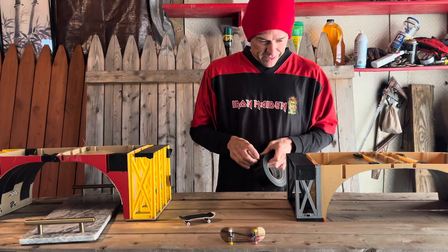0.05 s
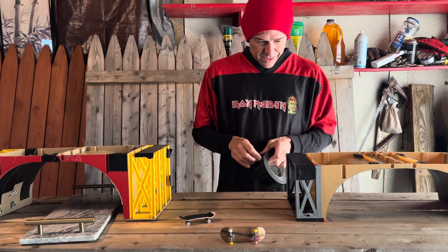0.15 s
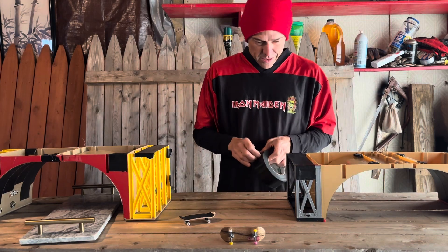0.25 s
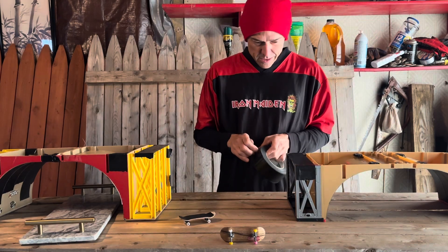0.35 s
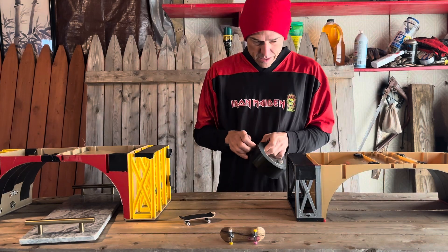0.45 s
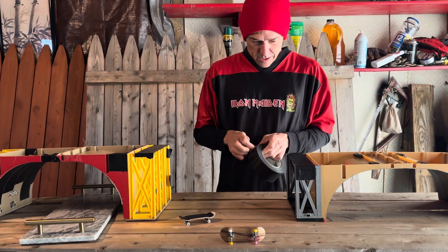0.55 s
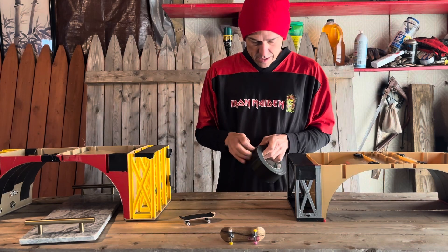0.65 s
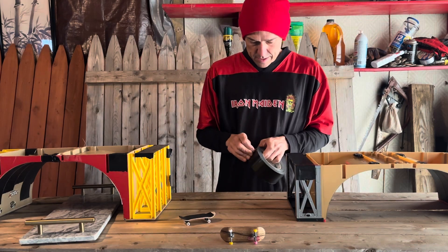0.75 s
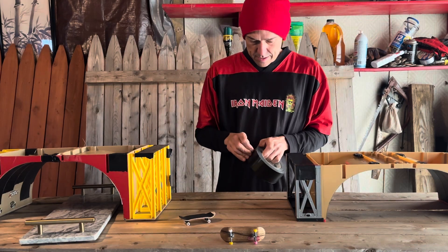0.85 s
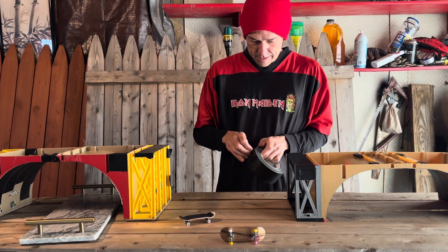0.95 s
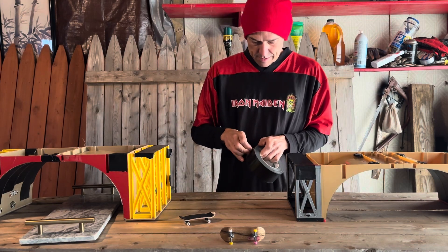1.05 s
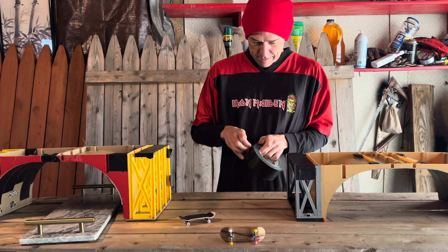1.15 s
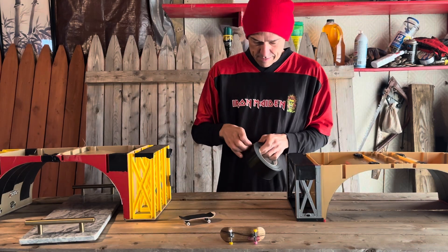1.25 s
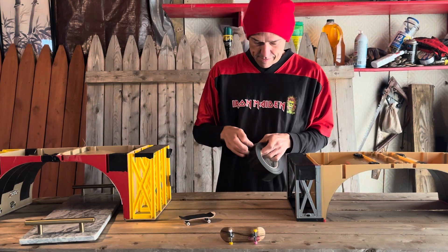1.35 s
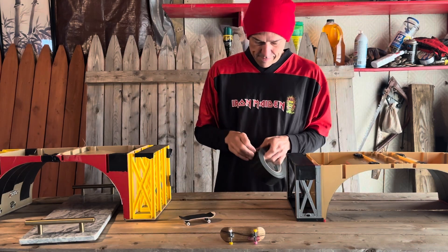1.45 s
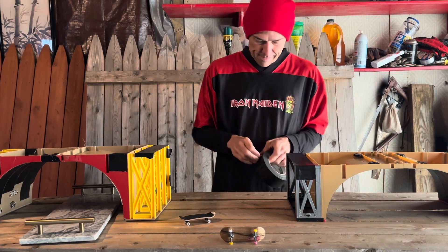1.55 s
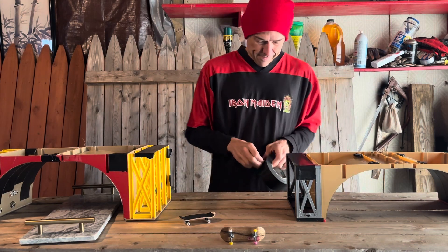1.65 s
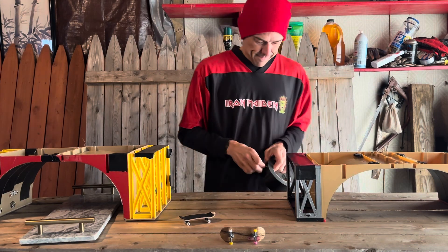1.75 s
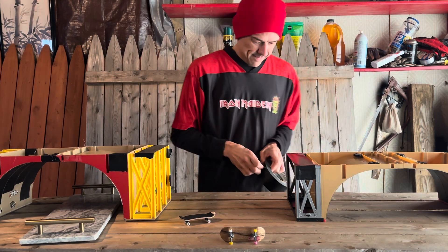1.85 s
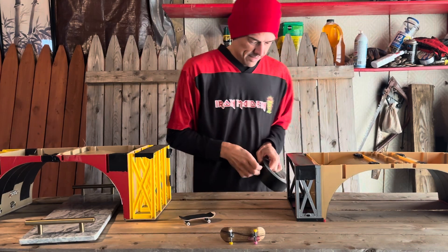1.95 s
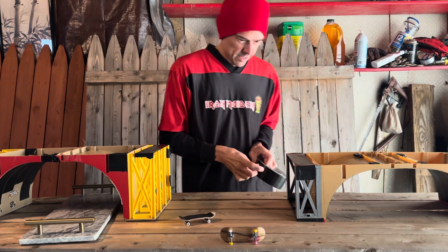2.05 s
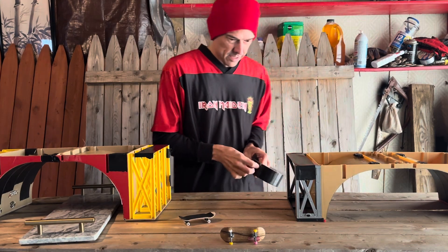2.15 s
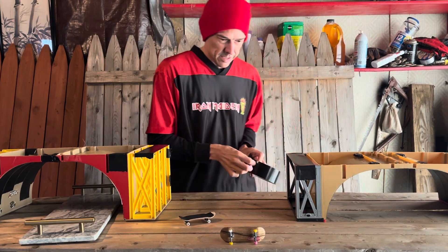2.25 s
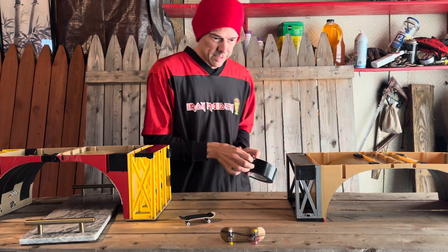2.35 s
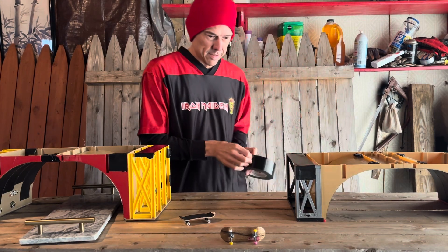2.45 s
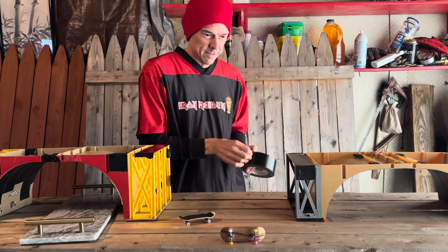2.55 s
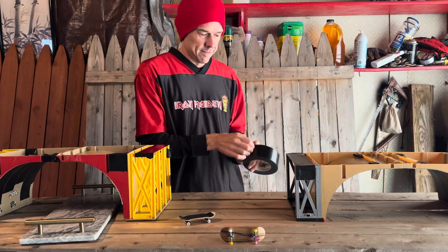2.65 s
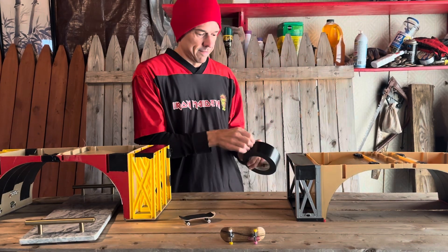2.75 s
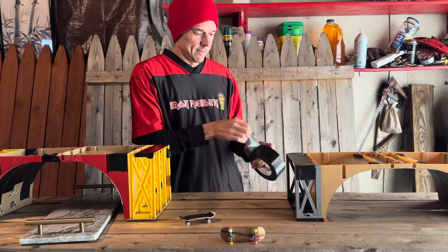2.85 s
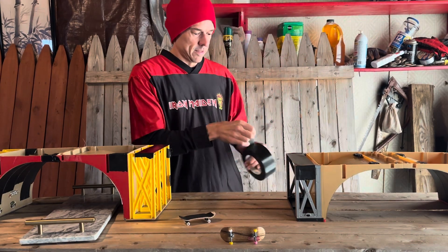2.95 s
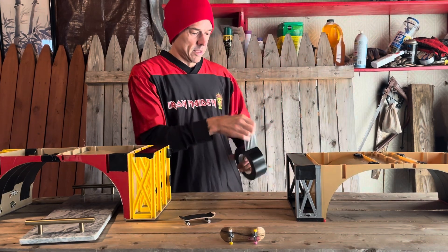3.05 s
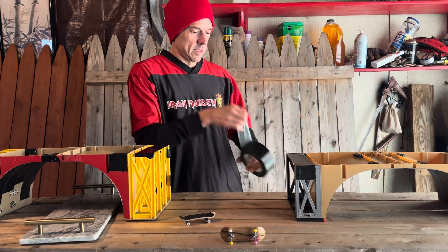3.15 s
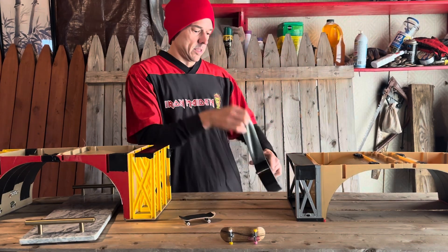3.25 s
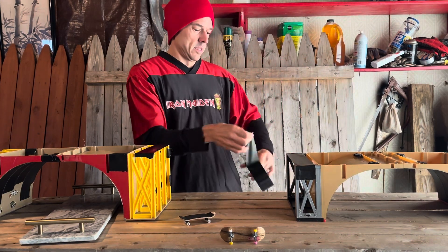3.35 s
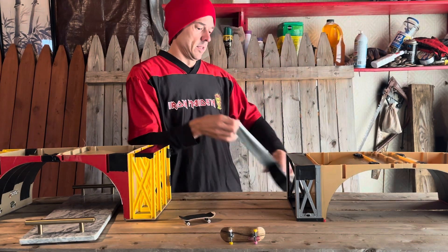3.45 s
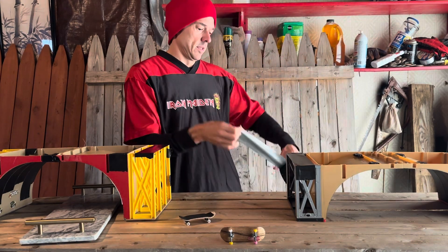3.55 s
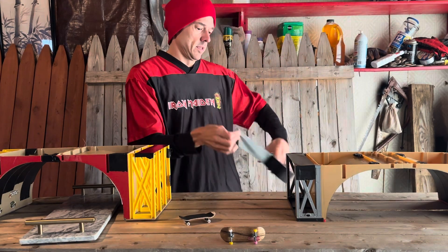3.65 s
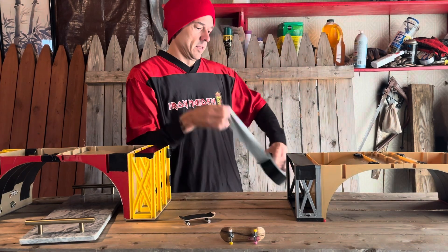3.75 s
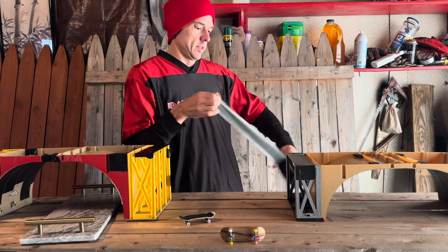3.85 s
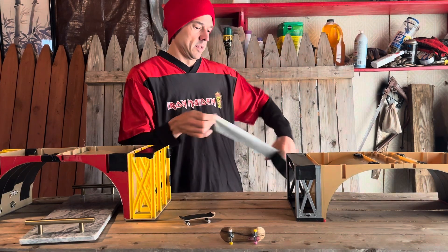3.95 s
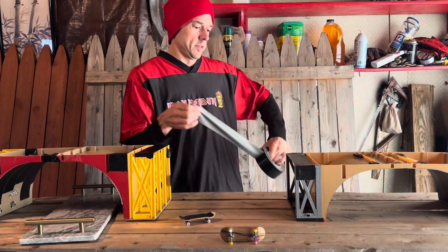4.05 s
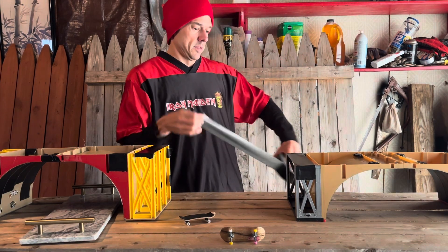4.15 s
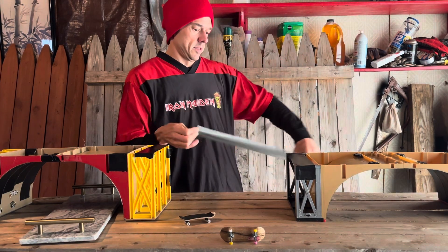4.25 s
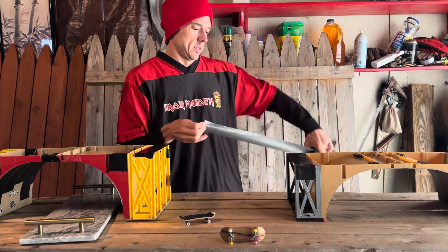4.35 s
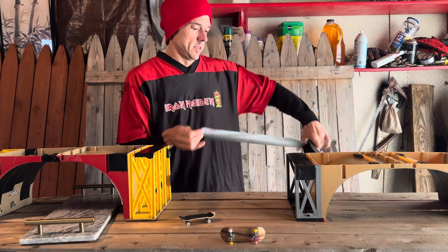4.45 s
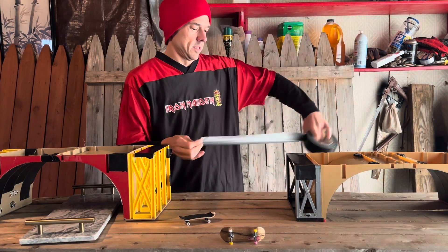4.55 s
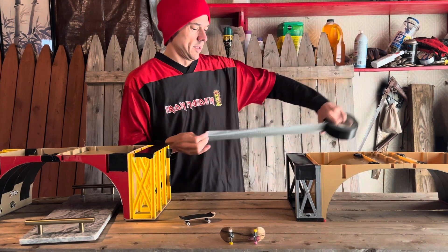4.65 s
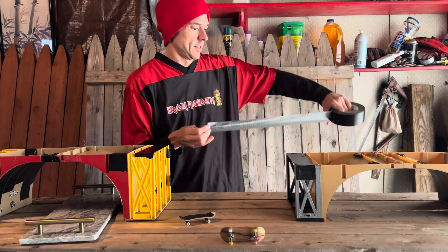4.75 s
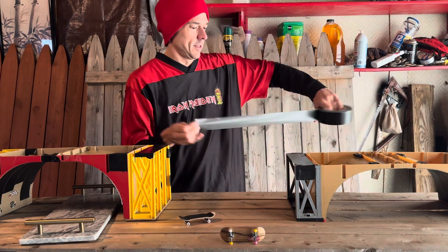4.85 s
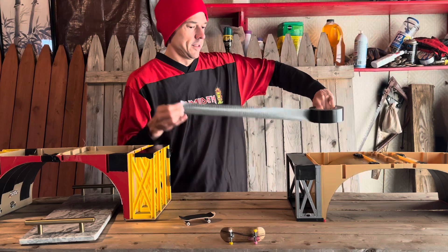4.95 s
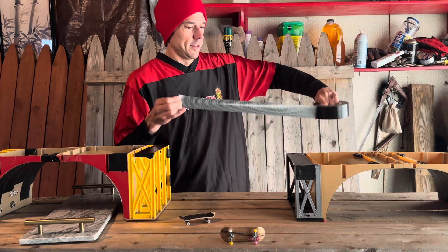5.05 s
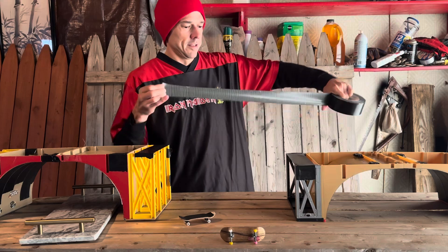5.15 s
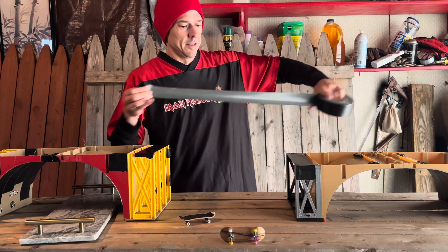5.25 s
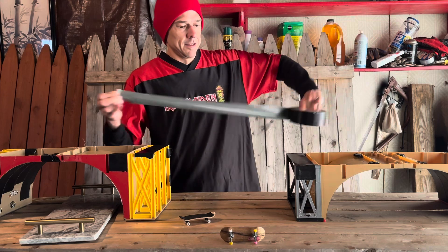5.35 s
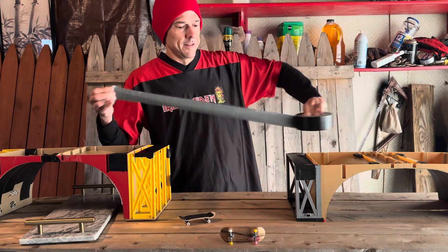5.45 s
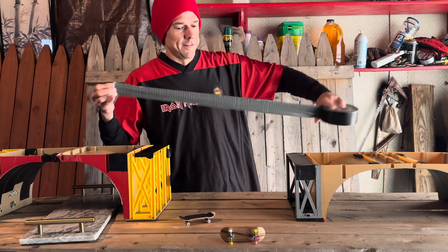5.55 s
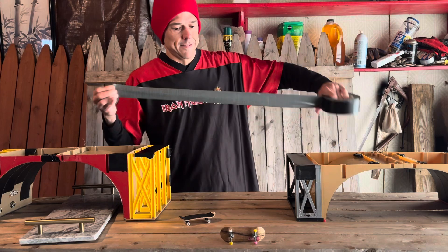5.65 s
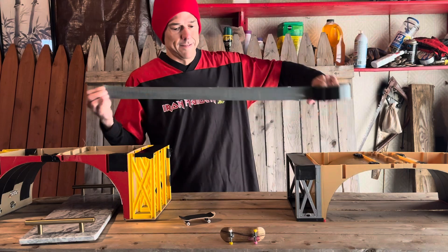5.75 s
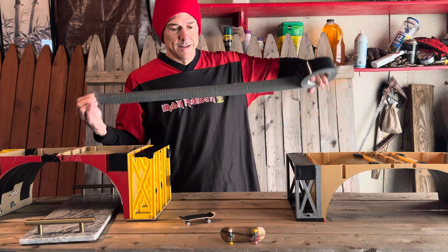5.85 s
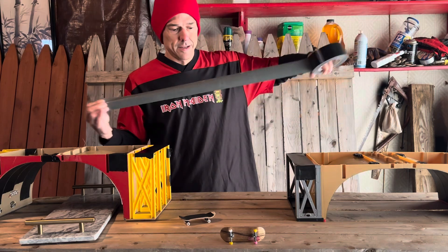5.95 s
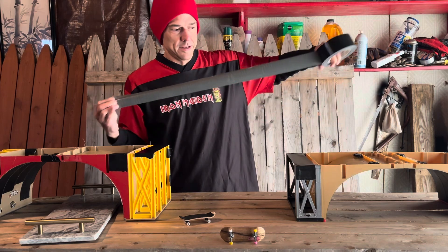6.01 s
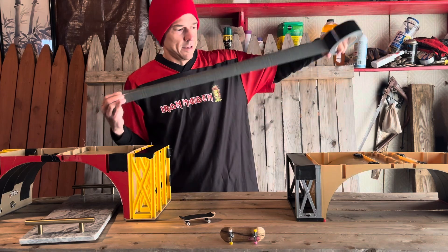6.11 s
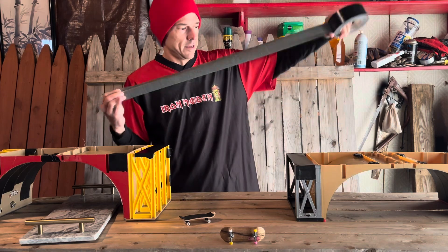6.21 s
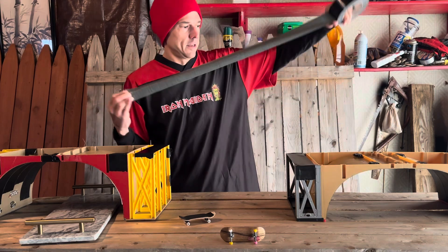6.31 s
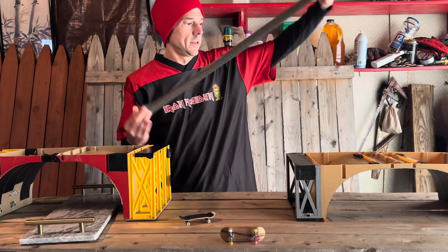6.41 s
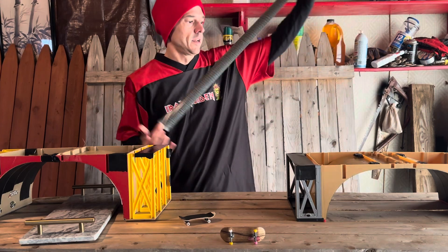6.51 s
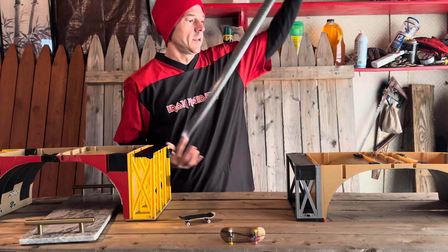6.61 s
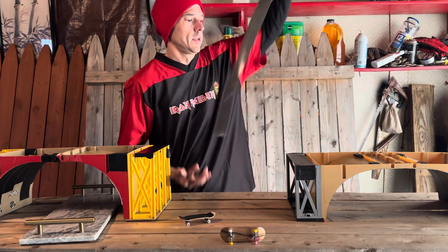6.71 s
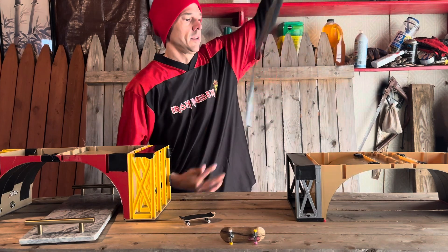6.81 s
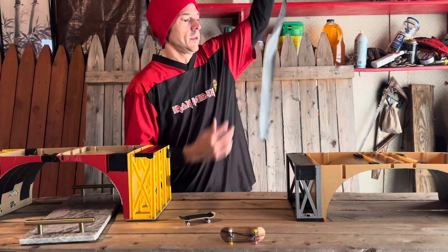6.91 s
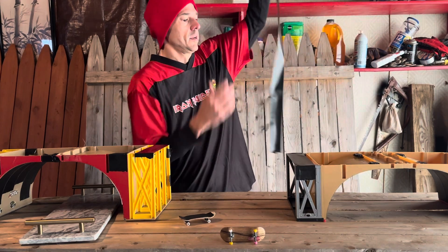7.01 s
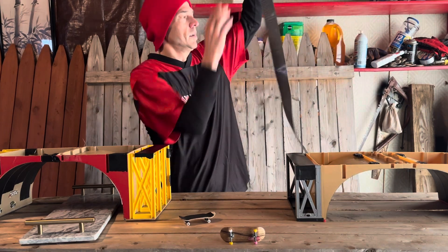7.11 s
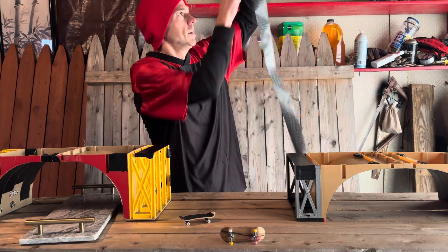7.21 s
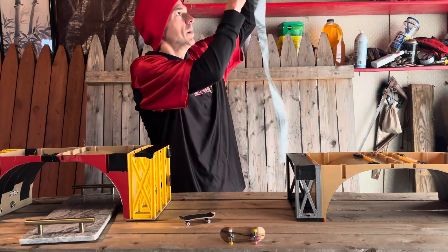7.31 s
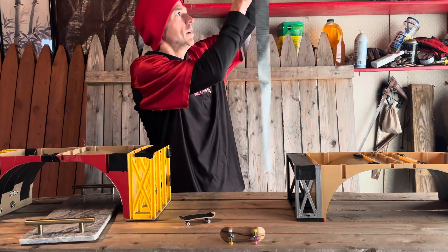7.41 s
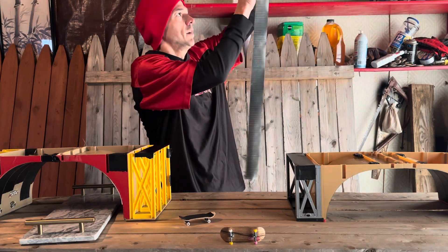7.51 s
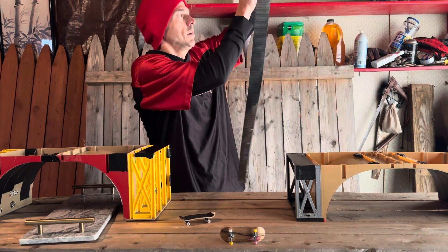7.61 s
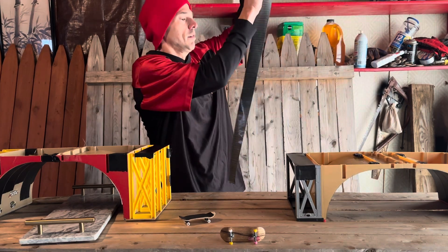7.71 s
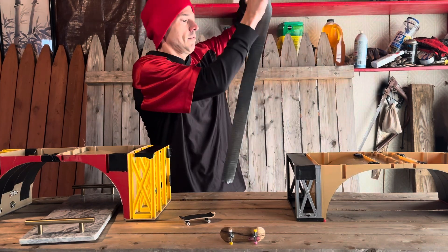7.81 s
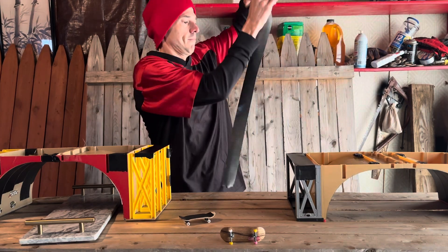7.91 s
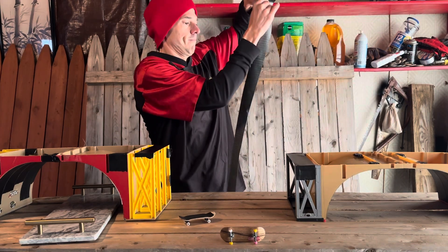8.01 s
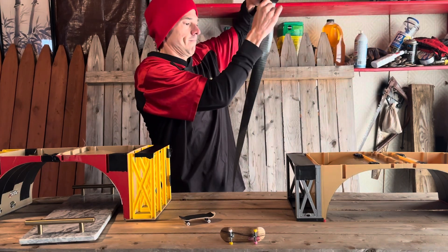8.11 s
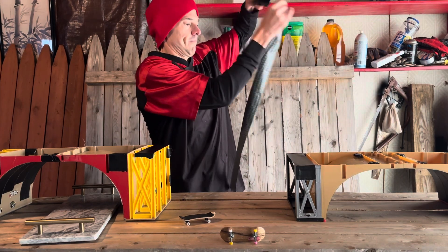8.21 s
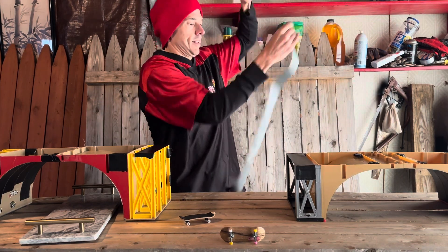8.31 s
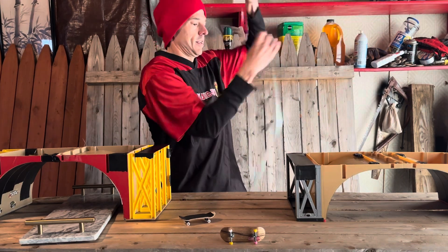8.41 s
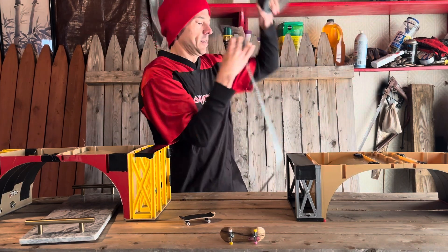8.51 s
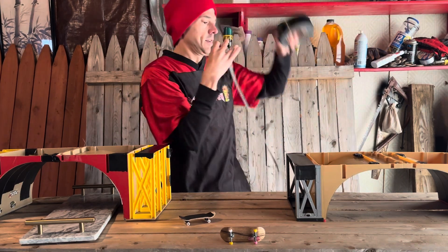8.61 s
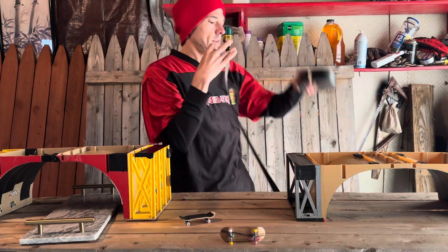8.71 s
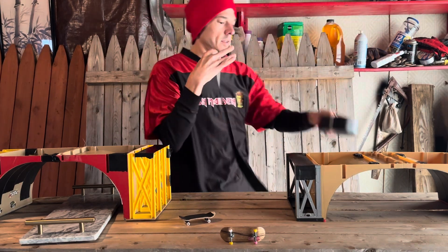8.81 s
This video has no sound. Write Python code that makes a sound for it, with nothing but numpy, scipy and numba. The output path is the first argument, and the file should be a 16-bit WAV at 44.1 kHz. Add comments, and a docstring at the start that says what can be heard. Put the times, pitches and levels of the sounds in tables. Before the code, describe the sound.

In a small workshop, fingers pick at a roll of duct tape with faint peels and dry snaps. A sudden rip drops quickly in pitch, followed by several loud, stuttering, raspy pulls with gaps between them. Later come weaker peels, one last brighter rip and small ticks. Soft sleeve rustle, low rumble and faint hiss lie underneath. Close stereo microphone, short room echo.

```python
"""In a small workshop, low rumble and faint hiss last throughout as steady shaped noise; sleeve rustle, more
shaped noise, comes in and varies with the arms' movement.
First duct tape is picked loose: brief peels and single snaps, noise bursts that crackle, ping and thud.
Then it is pulled off its roll in short jerks: uneven stick-slip clicks and fizzing thread breaks drive the
strip's modes, whose note falls as the strip gets longer. Sparser, mostly weaker peels and snaps close the scene.
Soft scuffs and bumps, swells of filtered noise, come between; the roll and nearby objects ring along."""
import sys
import numpy as np
from scipy import signal
from scipy.fft import rfft, irfft
from scipy.io import wavfile
from scipy.ndimage import uniform_filter1d
from numba import njit

SR = 44100
rng = np.random.default_rng(int(sys.argv[2]) if len(sys.argv) > 2 else 0)


def wav_record(signal):
    """Record a signal, one row per channel, as 16-bit PCM in the file named by sys.argv[1]."""
    frames = np.transpose(np.atleast_2d(signal))
    bounded = np.clip(frames, -1, 1)
    # unit amplitude maps onto the largest positive 16-bit level
    quanta = np.round(bounded * 32767).astype(np.int16)
    wavfile.write(sys.argv[1], SR, quanta)


N = 391166
TIME = np.arange(N) / SR  # s

# Steady rumble and hiss. Each row: frequency in Hz, relative density in dB.
FLOOR_SPECTRUM = [(25, -14), (45, -6.5), (75, 4.5), (130, -7.5), (250, -23), (500, -32), (900, -40),
                  (1500, -46), (2200, -34.5), (3200, -45), (4500, -51), (6200, -32.5), (7500, -39.5),
                  (9500, -58.5), (15000, -59)]
# Side against mid of that background. Each row: frequency in Hz, gain in dB.
FLOOR_WIDTH = [(60, -18), (200, -11.5), (600, 2), (2000, -4), (8000, 0.5)]
# Cloth noise of the sleeves. Each row: frequency in Hz, relative density in dB.
RUSTLE_SPECTRUM = [(120, -14.5), (250, -2.5), (450, -9), (800, -8), (1100, -18.5), (1500, -25),
                   (2400, -21.5), (5000, -36), (7000, -52)]
# Arm movement. Each row: time in seconds, rustle level in dB.
ARM_MOVEMENT = [(0, -101), (1.25, -78.5), (1.9, -84), (3.7, -70.5), (5, -79), (5.9, -76.5), (6.8, -69.5),
                (7.6, -73.5), (8.87, -71)]

# Pulls of the hand, from a small pick to a full rip. Each row: start in seconds, length in seconds,
# fastest moment as a share of the length, swell in dB, relative levels of strip flutter, slip crackle
# and glue fizz in dB, first note in Hz, last note in Hz.
PULLS = [(0.52, 0.013, 0.72, 13, -72, -56.5, -55.5, 3000, 3020),
         (1.263, 0.0072, .9, 13, -69, -56, -42.5, 3300, 3300),
         (1.714, 0.046, 0.48, 16, -47, -61, -45.5, 3920, 3700),
         (1.952, .078, 0.37, 23, -55, -53, -46, 3600, 3200),
         (2.246, 0.029, .6, 10, -78, -56, -64.5, 2200, 2100),
         (2.684, 0.022, 0.66, 12, -67, -72, -66.5, 5000, 5060),
         (2.746, .008, .9, 4.5, -62, -53, -53.5, 5600, 5140),
         (2.768, .080, .48, 3, -28.5, -26, -34.5, 4830, 561),
         (3.102, 0.14, 0.66, 9, -22.5, -27.5, -36.5, 518, 338),
         (3.407, 0.094, 0.71, 6.5, -26, -31.5, -36, 443, 406),
         (3.686, 0.034, 0.33, 8, -44.5, -46.5, -47.5, 487, 477),
         (3.733, 0.12, 0.73, 3.5, -28.5, -30, -37.5, 437, 350),
         (4.2, 0.092, 0.55, 9, -30, -28, -37.5, 540, 363),
         (4.632, 0.031, 0.36, 3.5, -33.5, -37.5, -44, 397, 397),
         (5.043, 0.09, 0.67, 7, -28, -30, -38.5, 423, 406),
         (5.428, .130, 0.85, 6.5, -29, -35.5, -41, 394.5, 284),
         (6.133, 0.028, .9, 1.5, -71, -63, -66, 337, 334),
         (6.155, 0.055, 0.54, 12.5, -34.5, -30, -38, 342, 322),
         (6.442, 0.012, 0.64, 12, -64.5, -52, -67, 896, 900),
         (6.652, 0.0434, .1, -6.5, -45, -51.5, -49, 2100, 2136),
         (7.699, .030, 0.94, 3.5, -75.5, -72.5, -71, 3500, 3500),
         (8.129, 0.077, 0.25, 14, -42, -31.5, -33.5, 2940, 780),
         (8.705, 0.03, 0.75, 4, -70.5, -57.5, -60, 520, 475)]
# How flutter, crackle and fizz (in that order) answer the hand. Each row: time of the peak as a share of
# the hand's, share of the swell, easing off after the peak in dB per second.
RESPONSE = [(.8, 0.74, 91.5), (.98, 1.1, 132), (1.02, 1.4, 169.5)]
# The glue catches in mid-pull. Each row: time in seconds, dip in dB, half length in seconds.
CATCHES = [(3.189, 17.5, 0.0044), (3.441, 10.5, .008), (3.749, 13.5, 0.01), (3.79, 8.5, 0.011),
           (4.243, 17.5, 0.0067), (5.081, 4.5, .006), (5.453, 13, 0.013)]
# Modes of the strip. Each row: multiple of its note, relative level in dB, damping (1/Q),
# change of level in dB when the strip is short and stiff.
STRIP_MODES = [(.6, -4, .8, -13.5), (1, 0.5, 0.24, 0.5), (1.7, -3, 0.48, 1), (2.7, -6, 0.47, -1),
               (4.3, -13, 0.24, 0)]
# The hardest single slips. Each row: time in seconds, relative peak in dB.
HARD_SLIPS = [(3.169, -25), (3.215, -12.5), (3.83, -27), (4.221, -15), (5.0435, -9), (5.051, -9),
              (5.0722, -5), (5.098, -5.5), (5.115, -13)]
# Colour of the slips. Each row: frequency in Hz, gain in dB.
SLIP_COLOUR = [(150, 1.5), (400, -1), (800, 0), (1200, 1), (1650, -0.5), (2300, 4), (3200, 0), (4600, -2),
               (6500, -7.5), (8500, -16.5), (12000, -40.5)]
# Colour of the glue fizz. Each row: frequency in Hz, gain in dB.
FIZZ_COLOUR = [(2500, -19.5), (6000, 0), (8500, 2), (10000, -3), (11300, -32), (13000, -0.5), (15500, -6)]

# Spots of glue that crack off. Each row: time in seconds, relative level in dB, pitch in Hz,
# low thud in dB against the crack.
SNAPS = [(0.5267, -29.5, 6100, -28), (1.022, -29, 5500, -21), (1.273, -21, 6030, -15.5),
         (1.6914, -20.5, 8750, -21.5), (1.707, -15.5, 4500, -24), (1.7354, -9.5, 4350, -18.5),
         (1.7444, -16.5, 4860, -35), (1.945, -18, 5150, -39), (1.973, -16.5, 4930, -33),
         (1.977, -10.5, 4810, -26.5), (2.0091, -7.5, 2770, -29), (2.7528, -24, 6000, -18),
         (2.7659, -7, 4647, -25), (3.0988, -13.5, 1970, -13), (3.189, -21, 1980, -14),
         (3.403, -15.5, 3600, -8.5), (3.6882, -13, 2190, -11), (3.703, -17, 8480, -6),
         (3.7324, -26, 1890, -13), (3.7546, -16.5, 2300, -19), (4.0605, -15.5, 4380, -3),
         (4.155, -23.5, 7976, -11), (4.197, -14, 4800, -16), (4.6138, -15.5, 3860, -1),
         (4.6347, -12, 1940, -18), (5.4108, -11.5, 3920, -3), (5.4323, -16.5, 5160, -16.5),
         (5.4384, -10.5, 3200, -2.5), (5.5614, -6.5, 2296, -20.5), (6.075, -48.5, 7100, -20.5),
         (6.3644, -32, 6800, -27), (6.447, -24.5, 7130, -13.5), (6.533, -37, 2550, -25),
         (6.6543, -16, 2080, -14), (7.775, -53, 3960, -21.5), (8.7056, -35, 2100, -13)]
# Colour of a snap's crack. Each row: frequency in Hz, gain in dB.
SNAP_COLOUR = [(200, -9), (1000, -13), (2500, -2), (5000, 0.5), (7500, -4.5), (9500, -3), (11300, -16.5),
               (13000, -3), (16000, -1.5)]
# Resonances of the roll and the things on the bench. Each row: frequency in Hz, relative level in dB.
RESONANCES = [(220, 0), (315, 1), (380, -7.5), (505, 1.5), (637, 0), (790, -8), (937, -4), (1310, -5),
              (1434, -3), (1976, 5.5), (2445, -8)]

# Side against mid of the direct sound. Each row: frequency in Hz, gain in dB.
DIRECT_WIDTH = [(100, -29), (1500, -17.5), (5000, -7.5), (7000, -3), (8500, -10), (11000, 16.5),
                (13000, -2), (16000, -13)]
# Tone of the room's echo. Each row: frequency in Hz, gain in dB.
ECHO_COLOUR = [(100, -2.5), (400, 0.5), (1000, -1), (2500, -1), (6000, 1.5), (9000, 2.5), (15000, -6.5)]
# Extra colour of the echo's side signal. Each row: frequency in Hz, gain in dB.
ECHO_WIDTH = [(100, -13.5), (250, -10.5), (600, 1.5), (2000, -0.5), (8000, -1)]

# Scuffs of fingers on the roll and of the swinging strip. Each row: start in seconds, relative level in dB,
# swell time in seconds.
SCUFFS = [(0.61, -59.5, 0.06), (1.12, -73.5, 0.06), (1.28, -61, 0.038), (6.8, -64, 0.065),
          (7.17, -66, 0.084)]
# Rubbing noise of the scuffs. Each row: frequency in Hz, relative density in dB.
SCUFF_SPECTRUM = [(200, 8), (600, -2.5), (1250, 5), (1800, -2), (2800, -15.5), (5000, -17), (9000, -58)]
# Bumps of hands on the roll and of the slack strip. Each row: start in seconds, relative level in dB,
# pitch in Hz.
BUMPS = [(0.615, -59, 240), (1.655, -55, 325), (3.51, -45, 71.6), (3.799, -41, 90.2), (6.736, -43.5, 88.5),
         (8.72, -48, 230)]

RELEASE_S = 0.00096  # peeling dies away when the hand stops
NOTE_WOBBLE_OCTAVES = .22  # rms, for a long strip
STIFF_HZ = 2550  # a strip with a note above this is too short to flutter much
CUTOFF_HZ = 16200


def from_db(db):
    """An amplitude ratio is ten to the power of its decibels over twenty."""
    return 10 ** (np.asarray(db) / 20)


def rms_one(x):
    """Normalisation divides by the root mean square."""
    return x / np.sqrt(np.mean(x ** 2) + 1e-20)


def evened(x):
    """Local normalisation keeps the grain but holds the running rms, over 25 ms, near 1."""
    return x / np.sqrt(np.abs(uniform_filter1d(x ** 2, size=1100)) + 1e-9)


def whitened(x):
    """Phase alone keeps the timing: every frequency gets equal strength, with energy 1."""
    spectrum = rfft(x)
    return irfft(spectrum / (np.abs(spectrum) + 1e-12), len(x))


def butter(x, hz, kind, order=2):
    """A Butterworth filter has a maximally flat passband."""
    sos = signal.butter(order, np.clip(hz, 15, .45 * SR), kind, fs=SR, output="sos")
    return signal.sosfilt(sos, x + 1e-18)


def colour(x, spectrum):
    """A folded cepstrum gives the causal, minimum-phase filter that follows a table of (Hz, dB)."""
    size = 4096
    hz, db = np.transpose(spectrum)
    grid = np.maximum(np.fft.rfftfreq(size, 1 / SR), 1)
    gain = from_db(np.interp(np.log(grid), np.log(hz), db))
    cepstrum = irfft(np.log(gain))
    cepstrum[1:size // 2] *= 2
    cepstrum[size // 2 + 1:] = 0
    impulse_response = irfft(np.exp(rfft(cepstrum)))
    return signal.fftconvolve(x, impulse_response)[:len(x)]


def noise(spectrum):
    """White noise through a filter takes on the filter's spectrum; its rms is set to 1."""
    return rms_one(colour(rng.standard_normal(N), spectrum))


def stereo(mid, side):
    """Sum and difference of mid and side give the two channels."""
    return np.array([mid + side, mid - side])


@njit
def moving_resonance(x, tangent, damping):
    """A state-variable filter with a moving note yields the band at the note, and all above it."""
    band, above = np.zeros(len(x)), np.zeros(len(x))
    s1 = s2 = 0.
    for i in range(len(x)):
        g = tangent[i]
        above[i] = (x[i] - (damping + g) * s1 - s2) / (1 + g * (g + damping))
        band[i] = g * above[i] + s1
        s1 = band[i] + g * above[i]
        s2 += 2 * g * band[i]
    return band, above


def background(floor_db):
    """Steady random noise makes rumble and hiss; friction of cloth follows the arms' movement."""
    floor = stereo(noise(FLOOR_SPECTRUM), colour(noise(FLOOR_SPECTRUM), FLOOR_WIDTH))
    sleeves = stereo(noise(RUSTLE_SPECTRUM), from_db(-2) * noise(RUSTLE_SPECTRUM))
    rustle_db = np.interp(TIME, *np.transpose(ARM_MOVEMENT))
    return from_db(floor_db) * floor + from_db(rustle_db) * sleeves


def pulling():
    """A lengthening strip lowers its note; flutter, crackle and fizz swell and ease with the hand's speed."""
    gains, note = np.zeros((3, N)), np.full(N, float(STIFF_HZ))
    for start, length, fastest, swell_db, *levels_db, first_hz, last_hz in PULLS:
        near = (TIME >= start) & (TIME < start + length + 10 * RELEASE_S)
        t = TIME[near] - start
        # the hand speeds up, then brakes
        unrolled = np.sin(np.pi / 2 * np.minimum(t / length, 1)) ** 2
        note[near] = 1 / ((1 - unrolled) / first_hz + unrolled / last_hz)
        release = np.exp(-np.maximum(t - length, 0) / RELEASE_S)
        for gain, db, (lead, follows, ease_db_per_s) in zip(gains, levels_db, RESPONSE):
            peak_s = max(fastest * lead * length, 1e-3)
            rise_db = -swell_db * follows * np.maximum(1 - t / peak_s, 0)
            ease_db = -ease_db_per_s * np.maximum(t - peak_s, 0)
            gain[near] = np.maximum(gain[near], from_db(db + rise_db + ease_db) * release)
    gains[0] /= 1 + (note / STIFF_HZ) ** 2  # a stiff strip hardly flutters
    caught_db = 0
    for s, dip_db, half_s in CATCHES:
        caught_db = caught_db + dip_db * np.exp(-np.minimum(((TIME - s) / half_s) ** 2, 20))
    return gains * from_db(-caught_db), note


def slips(per_s, jitter, waver, spread_db):
    """Stick and slip: tension builds and lets go at a wavering pace, with uneven force."""
    chance = rng.standard_normal((4000, 3))
    pace = waver * rms_one(uniform_filter1d(chance[:, 2], size=5))
    intervals_s = np.exp(jitter * chance[:, 0] + pace) / per_s
    at = (np.cumsum(intervals_s) * SR).astype(int)
    clicks = np.zeros(N)
    clicks[at[at < N]] = -from_db(spread_db * np.clip(chance[at < N, 1], -2, 1))
    return rms_one(clicks)


def threads(slip, per_s, cluster_s, steady):
    """Fracture: tiny threads of glue break at random, hardest just after a slip."""
    decay = np.exp(-1 / (cluster_s * SR))
    surge = rms_one(signal.lfilter([1], [1, -decay], np.abs(slip) + 1e-18))
    breaks = (rng.random(N) < per_s / SR) * rng.standard_normal(N)
    return rms_one(breaks * (steady + surge))


def peeling(flutter_db, crackle_db, fizz_db, thread_db, hard_db, shudder_db, shudder_hz):
    """Forced vibration: slips and threads drive the strip's modes; it radiates little below its note."""
    (flutter_gain, crackle_gain, fizz_gain), note = pulling()
    slip = slips(per_s=190, jitter=.2, waver=.17, spread_db=4.5)
    # a short, stiff strip peels smoothly; a long one jerks
    jerky = 1 / (1 + (note / 700) ** 2)
    # the strip's tension, and so its note, wobbles
    wobble = rms_one(uniform_filter1d(uniform_filter1d(rng.standard_normal(N), size=500), size=500))
    note = note * 2 ** (NOTE_WOBBLE_OCTAVES * jerky * wobble)
    snapping = threads(slip, per_s=9000, cluster_s=0.0018, steady=0.93)
    drive = evened(slip * jerky + from_db(thread_db) * snapping)

    flutter = 0
    for multiple, db, damping, short_db in STRIP_MODES:
        tangent = np.tan(np.pi * np.minimum(note * multiple, .35 * SR) / SR)
        band, _ = moving_resonance(drive, tangent, max(damping, .04))
        # each mode radiates only near its own pitch
        skirted, _ = moving_resonance(band, tangent, 1)
        flutter = flutter + from_db(db + short_db * (1 - jerky) ** 2) * evened(skirted)
    # a long strip also passes its jerks on to the roll, which shudders
    shudder = evened(butter(drive, [shudder_hz / 1.35, shudder_hz * 1.2], "band"))
    flutter = flutter + from_db(shudder_db) * jerky ** 3 * shudder

    _, crackle = moving_resonance(colour(drive, SLIP_COLOUR), np.tan(np.pi * note * .8 / SR), 1.0)
    fizz = evened(colour(threads(slip, per_s=4100, cluster_s=0.0018, steady=0.94), FIZZ_COLOUR))
    hard = np.zeros(N)
    for s, peak_db in HARD_SLIPS:
        hard[int(s * SR)] = -from_db(peak_db + hard_db)
    return (from_db(flutter_db) * flutter_gain * flutter
            + from_db(crackle_db) * crackle_gain * evened(crackle)
            + from_db(fizz_db) * fizz_gain * fizz
            + colour(butter(hard, 220, "high"), SLIP_COLOUR))


def snaps(level_db, fray_s, crumble_db, crumble_s, ping_db, thud_db, thud_hz, thud_s):
    """Sudden release: glue frays to a peak and crumbles on, while the taut strip pings and thuds."""
    out, t = np.zeros(N + 4096), TIME[:4096]
    for s, peak_db, hz, low_db in SNAPS:
        chance = rng.standard_normal((3, len(t)))
        fray = np.exp(-np.abs(t - .004) / max(fray_s, 1e-4))
        burst = whitened(chance[0] * fray) * fray ** 0.42
        burst += from_db(crumble_db) * chance[1] * t / crumble_s * np.exp(-t / crumble_s)
        crack = butter(burst, hz / 3, "high")
        crack = butter(crack, [hz / 1.5, min(hz * 1.8, 18000)], "band", order=1)
        ping = butter(burst, [hz, hz * 1.1], "band", order=1)
        crack = colour(crack + from_db(ping_db) * ping, SNAP_COLOUR)
        thud = butter(chance[2] * np.exp(-t / thud_s), [thud_hz / 2.2, thud_hz * 2.1], "band")
        at = int((s - .002) * SR)  # the thud begins 2 ms early, the fraying peaks 2 ms late
        out[at:at + len(t)] += from_db(peak_db + level_db) * (crack + from_db(thud_db + low_db) * thud)
    return out[:N]


def ringing(x, level_db, width_hz):
    """Sympathetic resonance: the roll and nearby objects ring along in narrow bands."""
    loudest_db = max(db for hz, db in RESONANCES)
    out = np.zeros(N)
    for hz, db in RESONANCES:
        b, a = signal.iirpeak(hz, hz / width_hz, fs=SR)
        out += from_db(db - loudest_db) * signal.lfilter(b, a, x + 1e-18)
    return from_db(level_db) * out


def workshop(x, echo_db, t60, treble_t60, early_db, early_s):
    """Reverberation: quick reflections off bench and body, then a short tail that loses its treble first."""
    t = TIME[:SR // 2]
    tails = []
    for white in rng.standard_normal((2, len(t))):
        low = butter(white, 4500, "low", order=1)
        tail = low * from_db(-60 * t / t60) + (white - low) * from_db(-60 * t / treble_t60)
        tail *= (t > .0015) * (1 + from_db(early_db) * np.exp(-t / early_s))
        tails.append(from_db(echo_db) * colour(tail / np.linalg.norm(tail), ECHO_COLOUR))
    mid = x + signal.fftconvolve(x, tails[0])[:N]
    side_tail = colour(tails[1], ECHO_WIDTH)
    side = colour(x, DIRECT_WIDTH) + signal.fftconvolve(x, side_tail)[:N]
    return stereo(mid, side)


def scuffs():
    """Sliding friction makes soft rubbing noise that swells and fades."""
    gain = np.zeros(N)
    for s, db, swell_s in SCUFFS:
        age = np.maximum(TIME - s, 0) / swell_s
        gain += from_db(db) * age * np.exp(-np.minimum(age, 20))
    return gain * stereo(noise(SCUFF_SPECTRUM), from_db(-5) * noise(SCUFF_SPECTRUM))


def bumps(length_s):
    """Soft impact excites mostly low frequencies: dull, rounded swells of low noise."""
    out, t = np.zeros(N + SR // 2), TIME[:SR // 2]
    for s, level_db, hz in BUMPS:
        low = rms_one(butter(rng.standard_normal(len(t)), [hz / 2.2, hz * 1.5], "band"))
        at = int(s * SR)
        out[at:at + len(t)] += from_db(level_db) * low * t / length_s * np.exp(-t / length_s)
    return out[:N]


def scene():
    """Superposition: tape just off centre in the workshop, over bumps, scuffs and the background."""
    tape = peeling(flutter_db=-4.5, crackle_db=-1, fizz_db=1.0, thread_db=-2.5, hard_db=9.5,
                   shudder_db=-10.5, shudder_hz=168)
    tape = tape + snaps(level_db=10.5, fray_s=0.00073, crumble_db=-36.5, crumble_s=0.0037,
                        ping_db=-1.0, thud_db=-18, thud_hz=600, thud_s=.008)
    tape = tape + ringing(tape, level_db=-5.5, width_hz=28)
    heard = workshop(tape, echo_db=-5.5, t60=0.33, treble_t60=0.21, early_db=-11.5, early_s=0.018)
    heard = heard * from_db([[-.7], [.7]])  # balance of the two channels
    return heard + bumps(length_s=0.021) + scuffs() + background(floor_db=-58)


def record(dry):
    """An elliptic low-pass cuts the top steeply."""
    return signal.sosfilt(signal.ellip(10, .2, 80, CUTOFF_HZ, fs=SR, output="sos"), dry)


dry = scene()
out = record(dry)
wav_record(out)
```